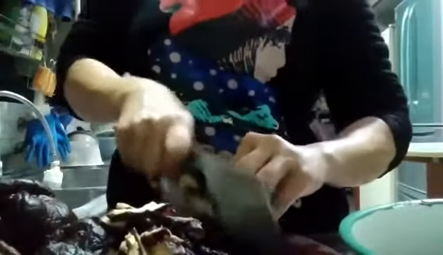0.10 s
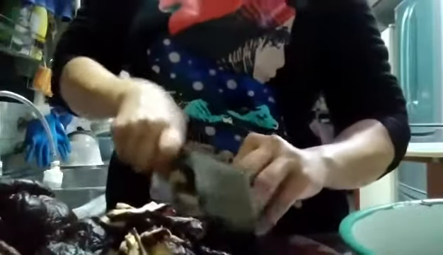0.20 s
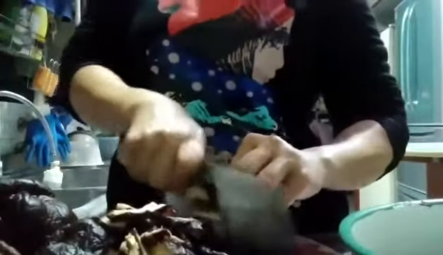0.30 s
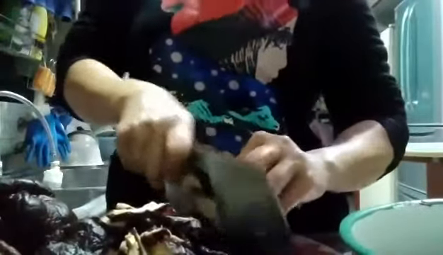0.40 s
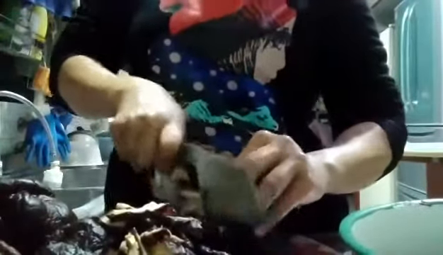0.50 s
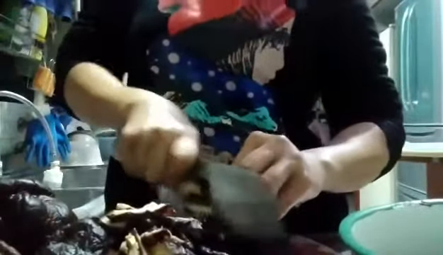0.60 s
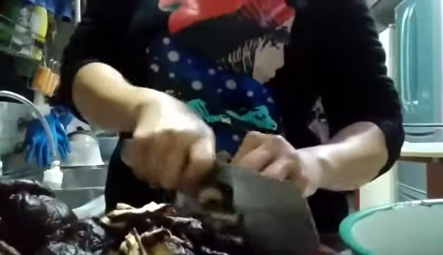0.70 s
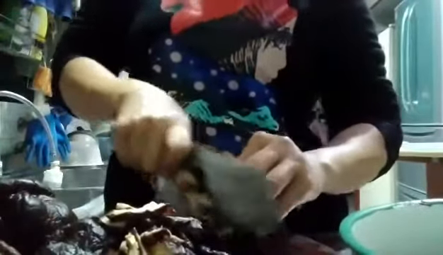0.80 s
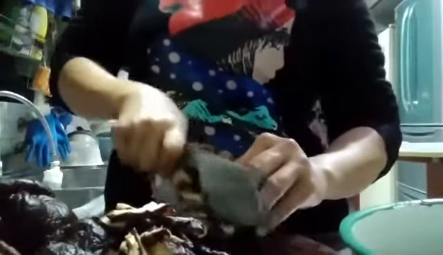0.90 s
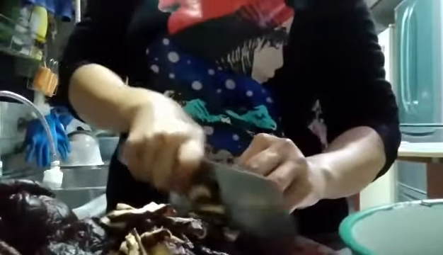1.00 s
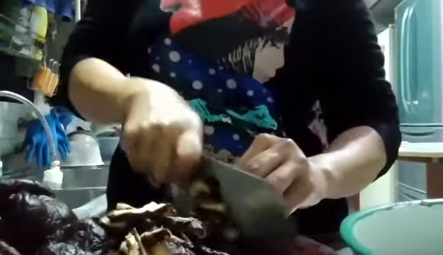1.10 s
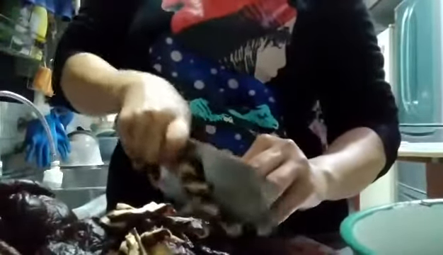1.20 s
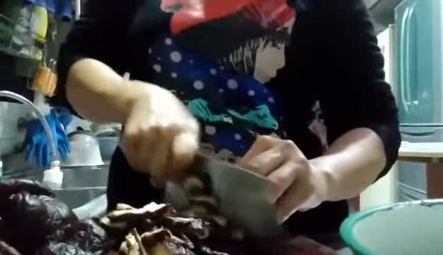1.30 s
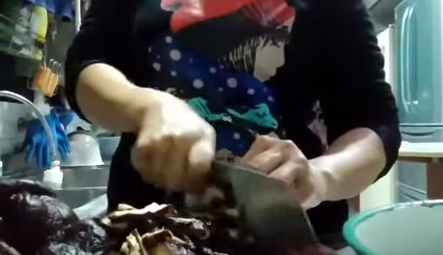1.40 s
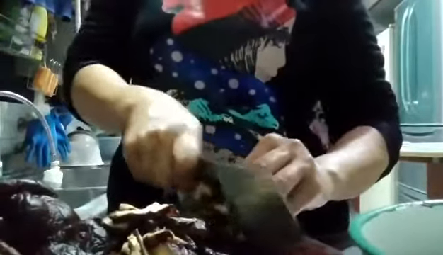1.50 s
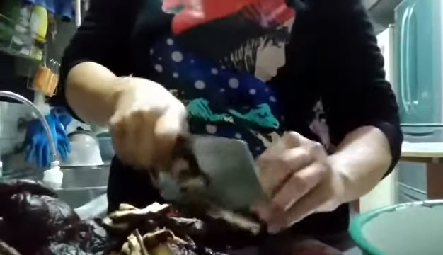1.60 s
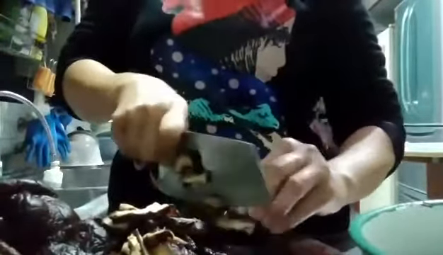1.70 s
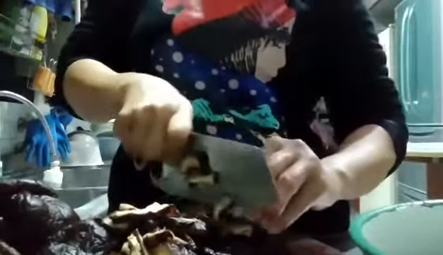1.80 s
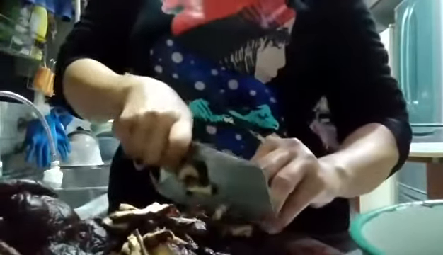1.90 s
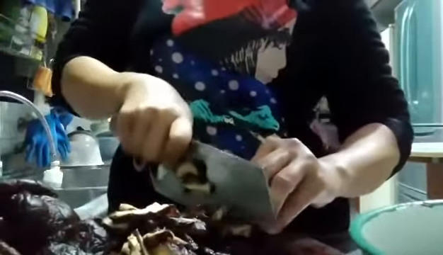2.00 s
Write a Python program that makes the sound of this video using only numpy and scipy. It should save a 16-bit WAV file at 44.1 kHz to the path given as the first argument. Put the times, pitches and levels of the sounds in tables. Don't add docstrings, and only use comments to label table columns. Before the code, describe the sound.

Cleaver chops on a wooden board, cutting mushrooms, heard very close in stereo. A hard, cracking, overloaded blow lands at 0.22 s, then softer, duller knocks at 0.59, 0.96 and 1.31 s, each a short hollow woody ring with slight low thump and brief dense kitchen echo. Faint damp blade brushes come between and until about 1.45 s; then only quiet low refrigerator hum, rumble and soft hiss remain.

```python
import sys
import numpy as np
from scipy import signal
from scipy.io import wavfile

SR = 44100
rng = np.random.default_rng(int(sys.argv[2]) if len(sys.argv) > 2 else 0)


def dump(signal):
    limited = np.clip(np.atleast_2d(signal).T, -1, 1)
    pcm = np.round(limited * 32767).astype(np.int16)
    wavfile.write(sys.argv[1], SR, pcm)


def field_ratio(decibels):
    return 10 ** (np.asarray(decibels, dtype=float) / 20)


N = 88200
PAD = 4410

# start_s, peak_db, contact_ms, crack_db
BLOWS = [
    (.2232, 5, 0.078, -13),
    (.5907, -2.5, 0.17, -24.5),
    (.9587, -1, .28, -27.5),
    (1.3056, 0, 0.27, -26.5),
]
EARLIER_BLOW_S, EARLIER_BLOW_DB = 0.06, -10.5
# mode_hz, left_db, right_db, t60_s, right_lag_cycles
BOARD_MODES = [(218.4, -18, -15.5, 0.071, 0.15), (281.8, -8.5, -10, 0.091, 0),
               (352.4, -16, -14, 0.12, 0.18), (583.6, -20.5, -9.5, 0.059, 0.56),
               (725.7, -6.5, -4, 0.062, .05), (800.6, -8.5, -4.5, 0.056, .6),
               (933, -11.5, -22, 0.053, 0.34), (1262, -6.5, -3, 0.031, 0.71),
               (1370, 2.5, -0.5, 0.029, 0.86), (1643, -5, -8, 0.028, 0.28), (2020, -8.5, 1, 0.012, 0.43),
               (2223, -5, -6.5, 0.03, 0.06), (2532, -11, -9.5, 0.032, .3), (3140, -22.5, -8, .022, 0)]
BOARD_DB, STRIKE_SPREAD_DB, BUILD_CYCLES = -5, 1.94, 0.8
THUMP_HZ, THUMP_DB, THUMP_T60_S, THUMP_LATE_S = 50.6, -23, 0.11, 0.0077
EDGE_EARLY_S, EDGE_DB = 0.003, -36
CRACK_T60_S, CRACK_LOW_HZ, CRACK_HIGH_HZ = 0.023, 2090, 4560

# start_s, peak_db, length_s
BRUSHES = [(0.162, -35.5, 0.014), (.342, -60, 0.012), (.572, -40, .02), (.698, -36, 0.018),
           (1.053, -46, 0.024), (1.35, -44, 0.065), (1.423, -39, 0.02)]
BRUSH_DB, BRUSH_LOW_HZ, BRUSH_HIGH_HZ, BRUSH_GRAINS_PER_S = -8, 1400, 7900, 1700

# tone_hz, rms_db, wander_hz
FRIDGE_TONES = [(54.4, -47, 2.0), (81.87, -37, 0.86), (119.23, -38, 0.2), (238, -50.5, .6)]
FRIDGE_WAVER_DB = 0.86

# band_hz, level_db
RUMBLE = [(25, -17), (50, -5), (100, 3), (160, -8), (250, -7), (500, -9.5), (900, -15.5), (1500, -19.5)]
# band_hz, level_db
HISS = [(1500, 7.5), (2500, 3.5), (4000, -2), (6300, -11), (8000, -11), (9700, -2), (11000, -12.5),
        (12500, -30)]
RUMBLE_DB, HISS_DB = -39.5, -52.5
# band_hz, correlation (-1..1)
LIKENESS = [(60, 0.94), (100, 0.91), (180, 0.92), (320, 0.81), (560, 0.5), (980, -0.22), (1720, -0.39),
            (3000, 0.01)]

# band_hz, t60_s
KITCHEN_T60 = [(200, 0.32), (700, 0.3341), (1400, .4), (2500, 0.3753), (5000, 0.26), (10000, .15)]
# band_hz, level_db
KITCHEN_COLOUR = [(200, 0), (700, 1), (1400, -3.5), (2500, -1), (5000, 1), (10000, -6)]
KITCHEN_DB, FIRST_ECHO_S = -41, 0.0034

TREBLE_CUT_HZ, CLIP_TOP, CLIP_KNEE = 11500, 1.25, 4.9


def rms_one(x):
    return x / np.sqrt(np.mean(x ** 2) + 1e-20)


def at_hz(points, hz):
    table_hz, value = np.transpose(points)
    return np.interp(np.log(hz), np.log(table_hz), value)


def band(x, low_hz, high_hz):
    sos = signal.butter(2, [low_hz, min(high_hz, 0.45 * SR)], "band", fs=SR, output="sos")
    return signal.sosfilt(sos, x)


def drift(rate_hz):
    r = np.exp(-80 * np.pi * rate_hz / SR)
    white = rng.standard_normal(N // 40 + 2002)
    slow = signal.lfilter([1], [1, -2 * r, r * r], white)[2000:]
    return np.interp(np.arange(N) / 40, np.arange(len(slow)), rms_one(slow - slow.mean()))


def third_octaves(low_hz, high_hz):
    edges = 25 * 2 ** np.arange(0, 9.4, 1 / 3)
    white = rng.standard_normal((2, 2, N))
    for k, (low, high) in enumerate(zip(edges, edges[1:])):
        hz = np.sqrt(low * high)
        if low_hz <= hz < high_hz:
            mid, side = band(white[k % 2], low, high)
            alike = np.clip(at_hz(LIKENESS, hz), -1, 1)
            yield hz, np.sqrt(1 + alike) * mid + np.sqrt(1 - alike) * side * [[1], [-1]]


def fridge():
    out = np.zeros(N)
    for hz, rms_db, wander_hz in FRIDGE_TONES:
        level = np.sqrt(2) * field_ratio(rms_db + FRIDGE_WAVER_DB * drift(1.8))
        cycles = np.cumsum(hz + wander_hz * drift(2)) / SR
        out += level * np.sin(2 * np.pi * cycles + rng.uniform(0, 5.72))
    return out


def room_air(spectrum, low_hz, high_hz, patchy_db):
    out = np.zeros((2, N))
    for hz, noise in third_octaves(low_hz, high_hz):
        out += field_ratio(at_hz(spectrum, hz) + patchy_db * drift(7.2)) * noise
    return out / np.std(out.mean(axis=0))


def kitchen_echo(x):
    t = np.arange(N) / SR
    tail = np.zeros((2, N))
    for hz, noise in third_octaves(120, 13000):
        tail += field_ratio(at_hz(KITCHEN_COLOUR, hz) - 60 * t / at_hz(KITCHEN_T60, hz)) * noise
    tail = tail[:, :SR] * np.clip(t[:SR] / FIRST_ECHO_S, 0, 1) ** 2
    return field_ratio(KITCHEN_DB) * signal.fftconvolve(x, tail, axes=1)[:, :x.shape[1]]


def brushes():
    t = np.arange(N) / SR
    swell = np.zeros(N)
    for start_s, peak_db, length_s in BRUSHES:
        u = (t - start_s - 0.3 * length_s) / (0.6 * length_s)
        swell += field_ratio(peak_db + BRUSH_DB) * np.exp(-0.5 * u ** 2)
    hit = rng.random((2, N)) < BRUSH_GRAINS_PER_S / SR
    grains = rng.standard_normal((2, N)) * hit
    return swell * rms_one(band(grains, BRUSH_LOW_HZ, BRUSH_HIGH_HZ))


def ring(force, hz, t60_s):
    r = field_ratio(-60 / (t60_s * SR))
    w = 2 * np.pi * hz / SR
    return signal.lfilter([0, np.sin(w)], [1, -2 * r * np.cos(w), r * r], force + 1e-18)


def pushes(starts_s, gains, contacts_ms):
    out = np.zeros(N + PAD)
    for start_s, gain, ms in zip(starts_s, gains, contacts_ms):
        i = int(start_s * SR + PAD) + np.arange(400)
        u = np.clip((i - PAD) / SR - start_s, 0, 1) / (ms * 1e-3)
        out[i] += gain * u * np.exp(-u) / (ms * 1e-3 * SR)
    return out


def board(start_s, peak_db, contact_ms):
    out = np.zeros((2, N + PAD))
    spread = rng.standard_normal((len(start_s), len(BOARD_MODES)))
    for k, (hz, left_db, right_db, t60_s, lag_cycles) in enumerate(BOARD_MODES):
        gain = field_ratio(peak_db + BOARD_DB + STRIKE_SPREAD_DB * spread[:, k])
        gain = gain * (-1) ** k
        left_s = start_s + BUILD_CYCLES / hz - 0.0005
        right_s = left_s + max(lag_cycles, 0) / hz
        out[0] += field_ratio(left_db) * ring(pushes(left_s, gain, 0.31 * contact_ms), hz, t60_s)
        out[1] += field_ratio(right_db) * ring(pushes(right_s, gain, 0.28 * contact_ms), hz, t60_s)
    return out


def thump(start_s, peak_db):
    force = pushes(start_s + THUMP_LATE_S, field_ratio(peak_db + THUMP_DB), np.ones(len(start_s)))
    return ring(force, THUMP_HZ, THUMP_T60_S)


def crack(start_s, peak_db, crack_db):
    t = (np.arange(N + PAD) - PAD) / SR
    burst, edge = np.zeros((2, N + PAD))
    for s, db, c in zip(start_s, peak_db, crack_db):
        burst += field_ratio(db + c) * (t > s) * field_ratio(-60 * np.abs(t - s) / CRACK_T60_S)
        edge += field_ratio(db + EDGE_DB) * ((t > s - EDGE_EARLY_S) & (t < s))
    noise = rng.standard_normal((2, 2, N + PAD))
    wood = rms_one(band(noise[0], CRACK_LOW_HZ, CRACK_HIGH_HZ))
    flesh = rms_one(band(noise[1], 1000, 4100))
    return wood * burst + flesh * edge


def chops():
    earlier = (-EARLIER_BLOW_S, EARLIER_BLOW_DB, 0.1, -30)
    start_s, peak_db, contact_ms, crack_db = np.transpose(list(BLOWS) + [earlier])
    out = board(start_s, peak_db, contact_ms)
    return out + thump(start_s, peak_db) + crack(start_s, peak_db, crack_db)


def scene():
    rumble = field_ratio(RUMBLE_DB) * room_air(RUMBLE, 25, 1500, patchy_db=0.0)
    hiss = field_ratio(HISS_DB) * room_air(HISS, 1500, 13000, patchy_db=2.04)
    blows = chops()
    echoed = (blows + kitchen_echo(blows))[:, PAD:]
    return fridge() + rumble + hiss + brushes() + echoed


def low_pass(x):
    return signal.sosfilt(signal.butter(12, 17000, fs=SR, output="sos"), x)


def record(dry):
    x = signal.sosfilt(signal.butter(6, TREBLE_CUT_HZ, fs=SR, output="sos"), dry)
    x = x / (1 + np.abs(x / CLIP_TOP) ** CLIP_KNEE) ** (1 / CLIP_KNEE)
    return low_pass(x)


dry = scene()
out = record(dry)
dump(out)
```